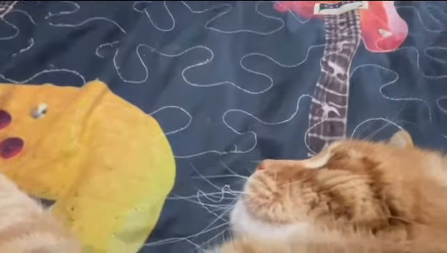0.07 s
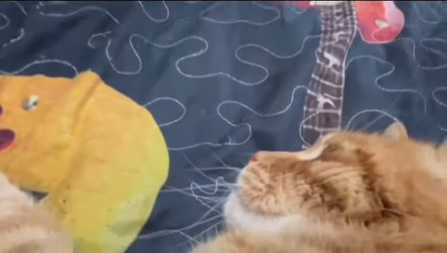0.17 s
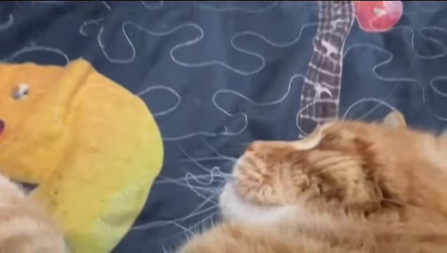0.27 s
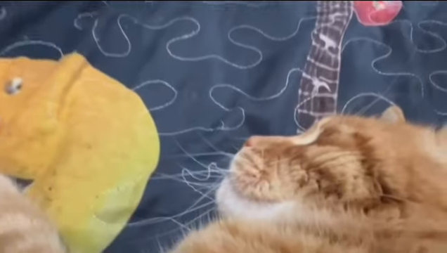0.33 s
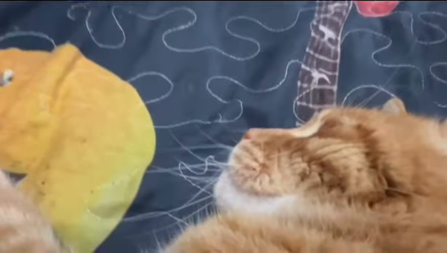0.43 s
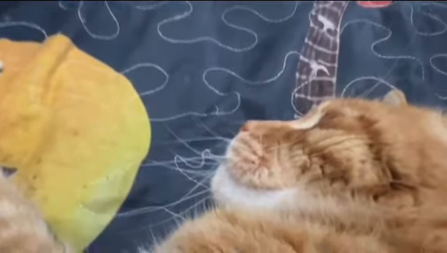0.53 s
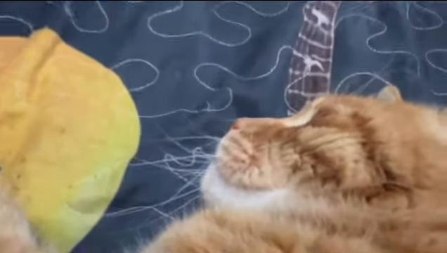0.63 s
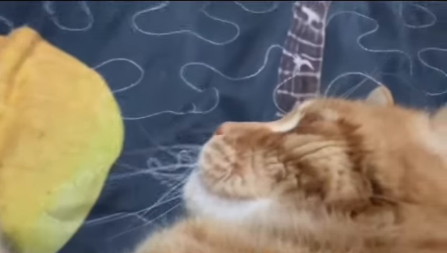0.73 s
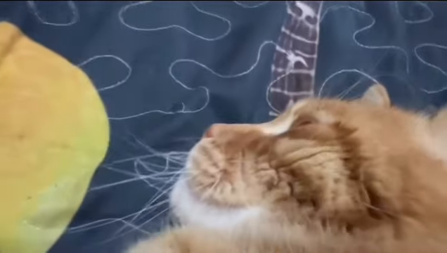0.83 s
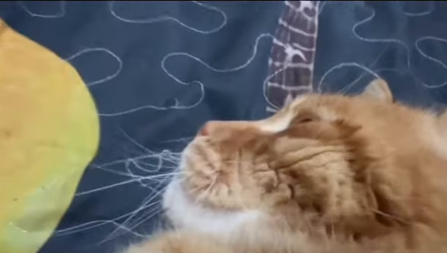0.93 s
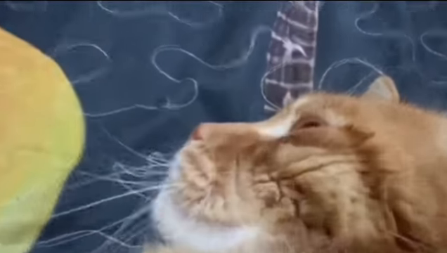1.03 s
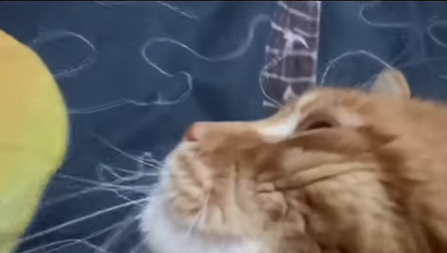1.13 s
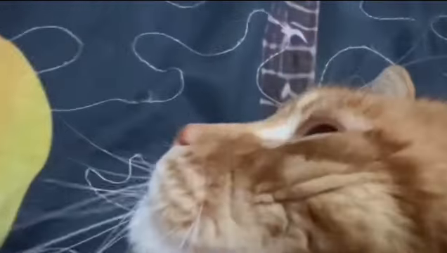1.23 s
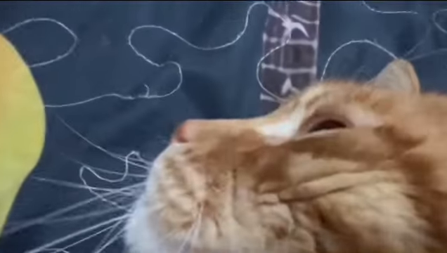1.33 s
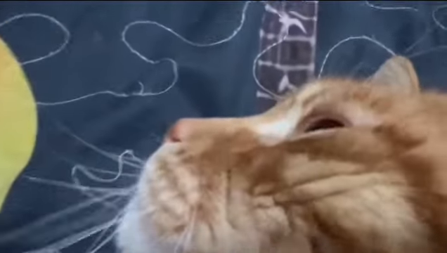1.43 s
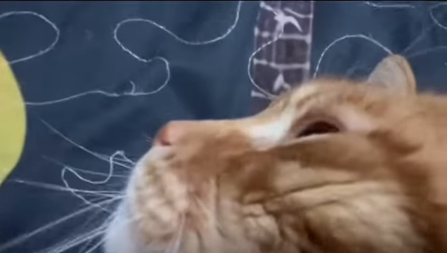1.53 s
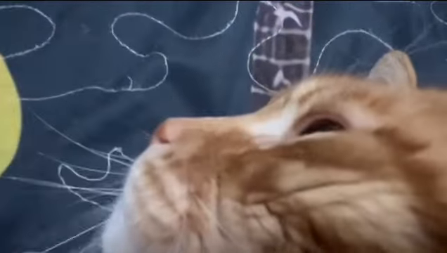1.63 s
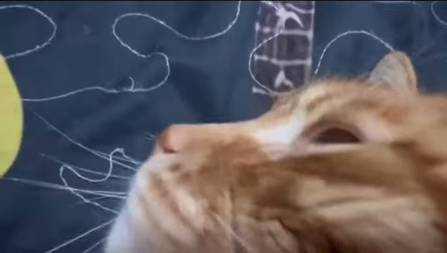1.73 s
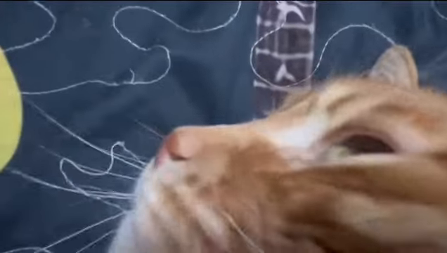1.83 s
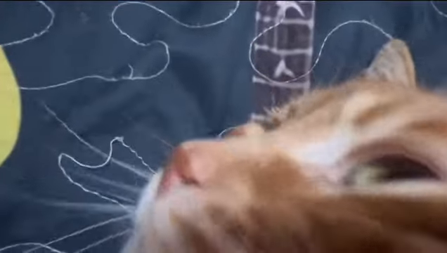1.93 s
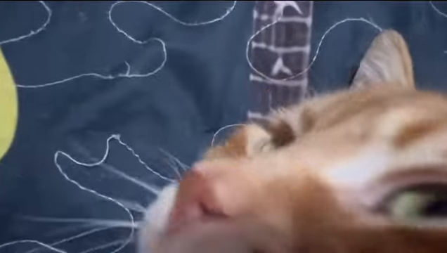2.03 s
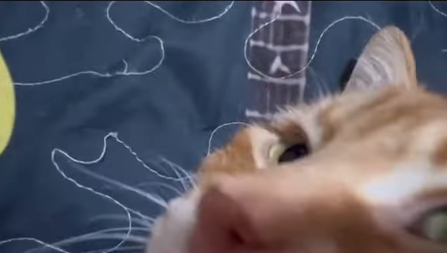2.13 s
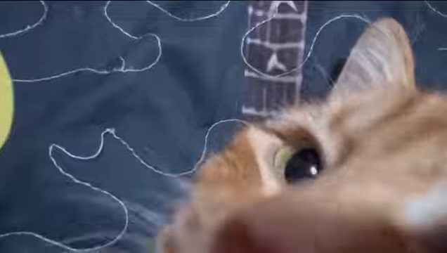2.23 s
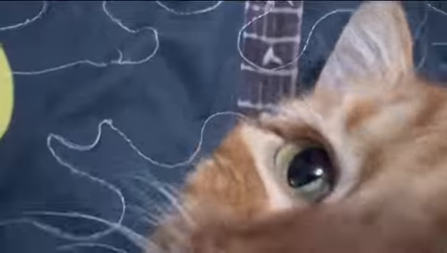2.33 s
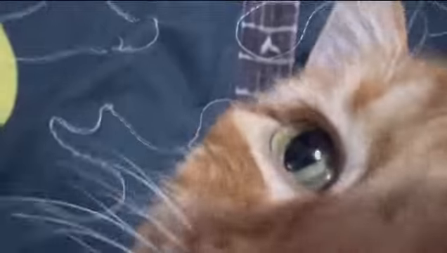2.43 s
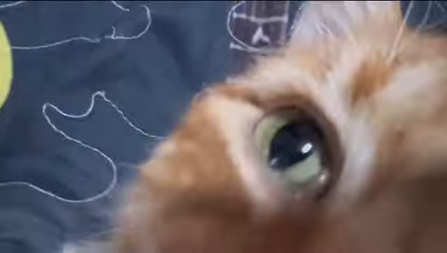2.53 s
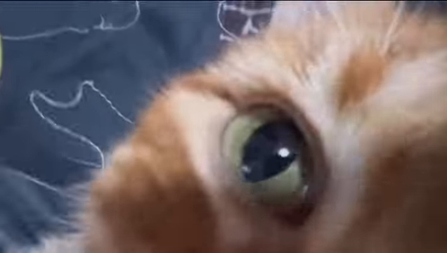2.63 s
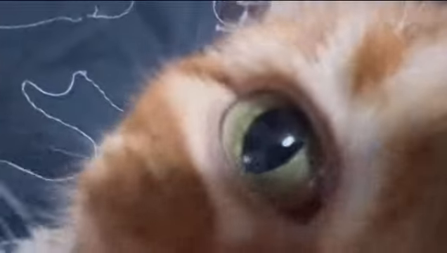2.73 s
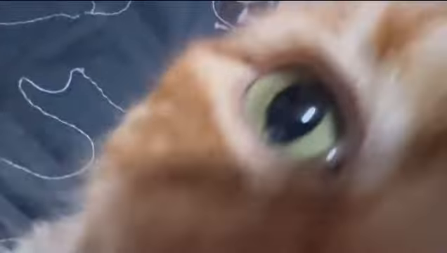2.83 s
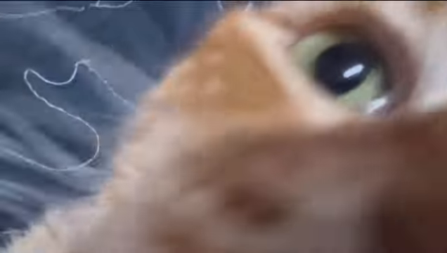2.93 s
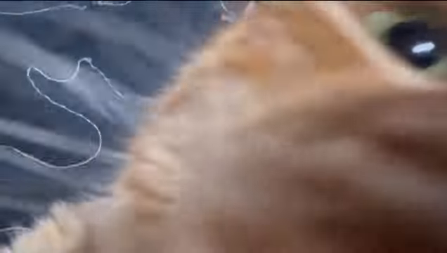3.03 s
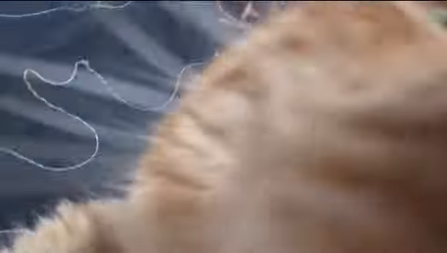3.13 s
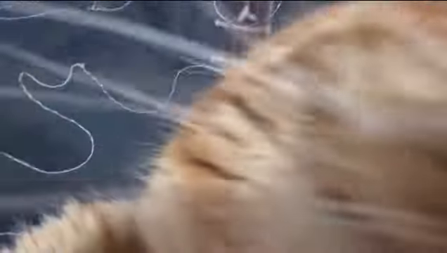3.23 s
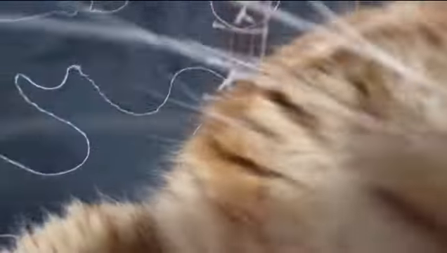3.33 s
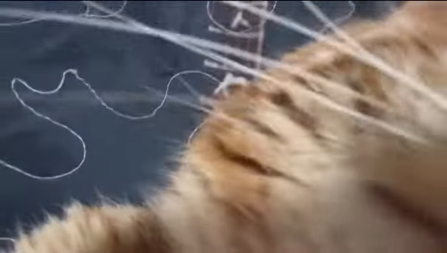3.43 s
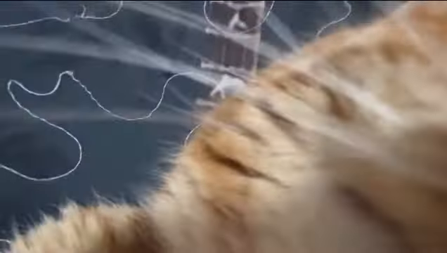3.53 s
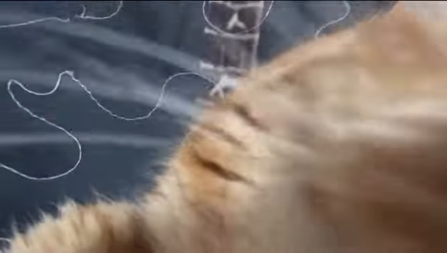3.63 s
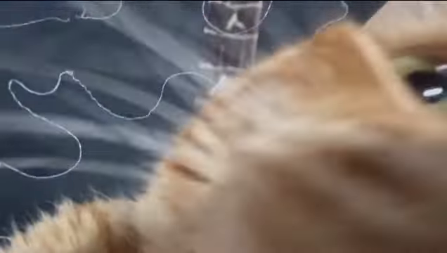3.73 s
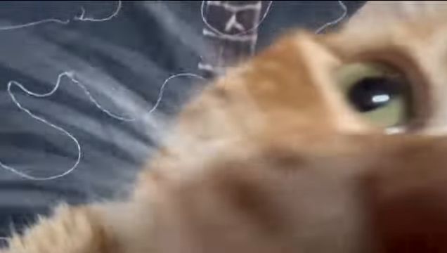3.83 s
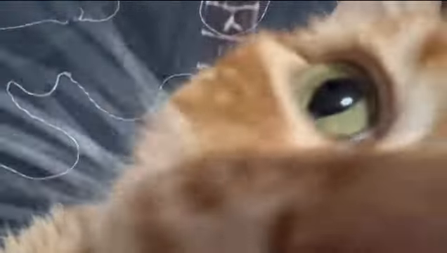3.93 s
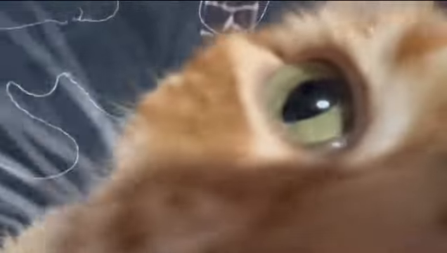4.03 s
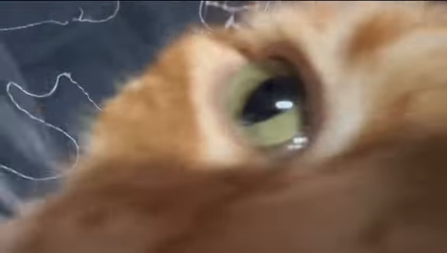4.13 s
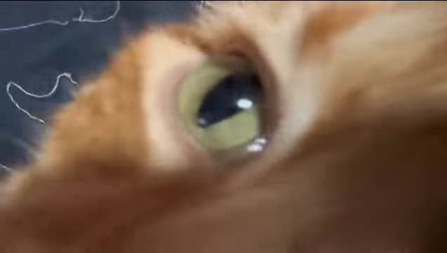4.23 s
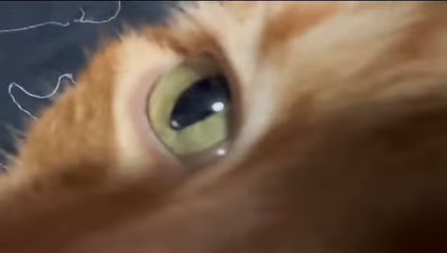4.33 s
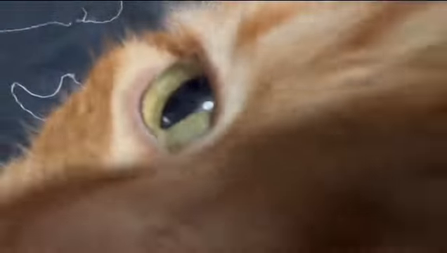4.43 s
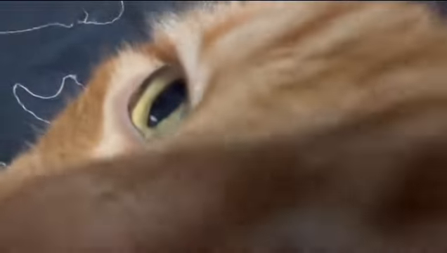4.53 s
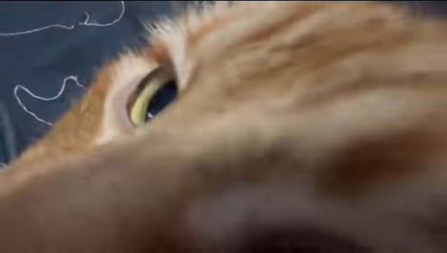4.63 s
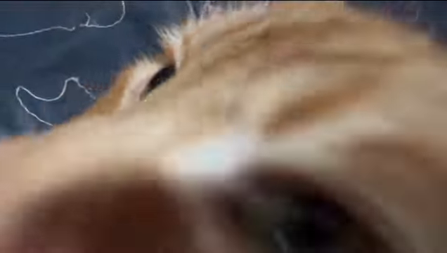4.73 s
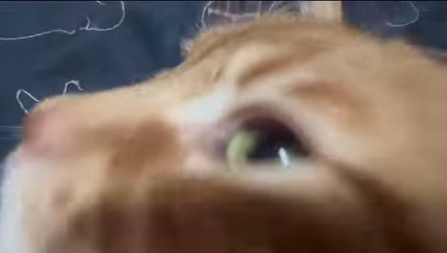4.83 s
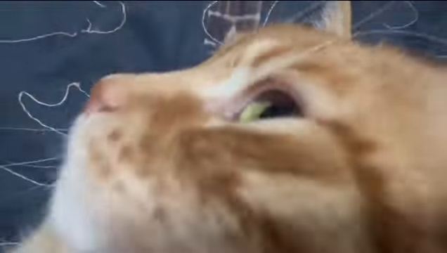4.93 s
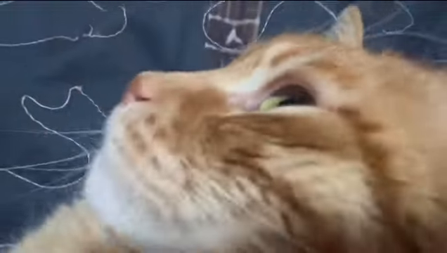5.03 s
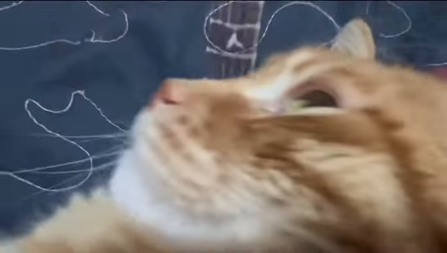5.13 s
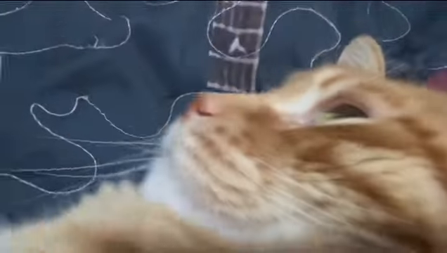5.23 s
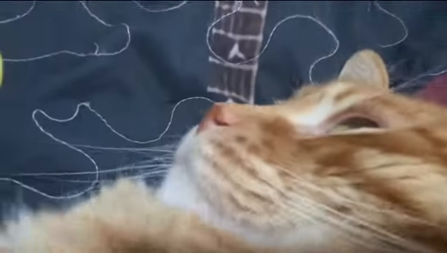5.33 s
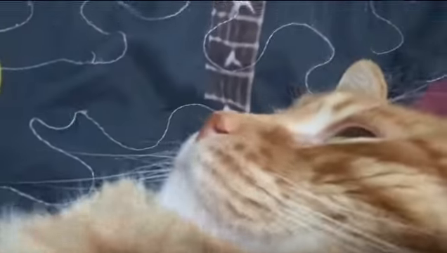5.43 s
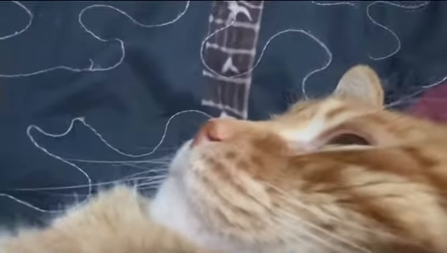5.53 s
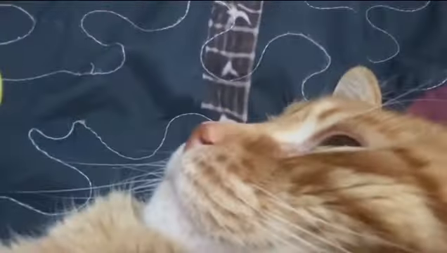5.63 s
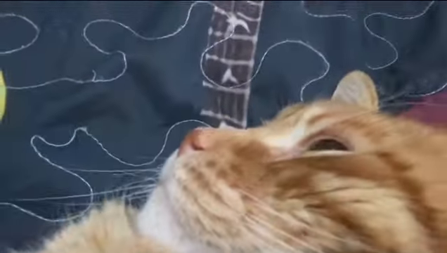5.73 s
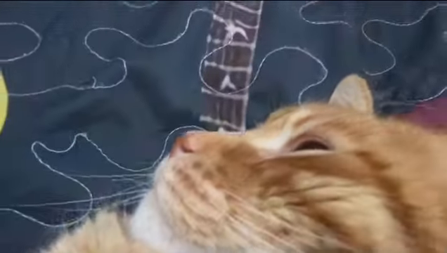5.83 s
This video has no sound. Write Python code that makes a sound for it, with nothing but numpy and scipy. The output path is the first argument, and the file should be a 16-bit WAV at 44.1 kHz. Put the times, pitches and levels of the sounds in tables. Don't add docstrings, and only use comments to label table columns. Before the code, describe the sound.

A cat purrs in a steady low flutter, then nuzzles the phone with loud rumbling, chopped sniffs, wet clicks and a blown breath before quieting.

```python
import sys
import numpy as np
from scipy import signal
from scipy.fft import rfft, irfft, next_fast_len
from scipy.io import wavfile
from scipy.ndimage import uniform_filter1d, map_coordinates

SR = 44100
rng = np.random.default_rng(int(sys.argv[2]) if len(sys.argv) > 2 else 0)


def voltage_ratio(decibels):
    exponent = np.asarray(decibels, float) / 20
    return 10 ** exponent


def persist_wave(psi):
    counts = np.round(np.clip(psi, -1, 1) * 32767).astype(np.int16)
    wavfile.write(sys.argv[1], SR, np.atleast_2d(counts).T)


N = 259749

# (time [s], closures [1/s])
PACE_HZ = [(0.0, 26.58), (0.66, 26.91), (1.54, 26.28), (1.76, 26.51), (2.2, 26.59), (2.42, 25.51),
           (3.08, 27.3), (3.52, 26.1), (3.74, 24.29), (4.4, 26.43), (4.84, 26.2), (5.06, 25.16),
           (5.89, 25.29)]
# (time [s], lead [ms])
HURRY_MS = [(0, 0), (1.7, 0), (1.9, 2), (2.05, -2), (2.25, -2), (2.38, 6), (2.51, 4), (2.56, -2), (2.6, -2),
            (2.66, 1), (2.75, 5), (2.88, 3), (3, 0), (3.95, 0), (4.07, 4), (4.2, 2), (4.35, -3), (4.95, -3),
            (5.05, -1), (5.4, -2), (5.7, 0), (5.89, 0)]
DOZE, HUM, DEEP = (.12, .28, 0, .3), (.2, .3, 0, .05), (.8, .45, 0, .04)
SNIFF, BLOW, SIGH, RASP = (.9, .19, .7, .11), (.95, .3, .1, .9), (.95, .54, .1, .8), (.4, .3, .1, .43)
TASTE, MURMUR = (.9, .42, 0, .06), (.15, .28, 0, .06)
# (start [s], way)
MOODS = [(0, DOZE), (.68, HUM), (1.3, DEEP), (2, SNIFF), (3.01, BLOW), (3.25, SIGH), (3.65, SNIFF),
         (3.93, DEEP), (4.04, TASTE), (4.27, RASP), (4.54, HUM), (5.03, MURMUR), (5.45, DOZE),
         (5.7, MURMUR)]
# (time [s], chest [dB], throat against chest [dB])
PURR_DB = [(0, -54.5, -13), (.3, -58, -15.5), (.54, -62, -11.5), (.8, -55, -14.5), (1.27, -57, -16),
           (1.38, -48.5, -15.5), (1.95, -42.5, -13), (2.37, -46.5, -20), (3.0, -52.5, -26.5),
           (3.7, -53, -10), (3.9, -43.5, -20), (4.23, -43, -18), (4.51, -52, -14), (4.58, -46.5, -16.5),
           (4.92, -49, -12.5), (5.0, -53.5, -17), (5.56, -65.5, -15), (5.89, -54.5, -12)]
# (peak [s], rise [s], fall [s], chest [dB], throat against chest [dB])
PRESSES = [(1.433, 0.026, 0.074, -56.5, 4), (2.073, 0.059, 0.17, -39, -6.5), (2.178, 0.061, 0.14, -35, -13),
           (2.41, 0.013, 0.024, -43.5, -6), (2.471, 0.075, 0.012, -32, -9),
           (2.525, 0.086, 0.27, -33.5, -12), (2.79, 0.16, 0.13, -41, -14.5),
           (2.911, 0.082, 0.11, -29, -9.5), (2.984, 0.11, 0.017, -34.5, -10),
           (3.08, 0.087, 0.09, -21.5, -11), (3.139, 0.088, 0.099, -15.5, -5.5),
           (3.207, 0.054, 0.11, -23, -35), (3.43, 0.79, 0.13, -43, -13.5), (3.61, 0.052, 0.068, -62, 0),
           (3.761, 0.051, 0.072, -46, -6), (3.849, 0.027, 0.14, -50.5, -2),
           (4.151, 0.13, 0.11, -40.5, -7.5), (5.081, 0.082, 0.2, -48.5, -6.5),
           (5.19, 0.082, 0.35, -51.5, -7)]
# (frequency [Hz], density [dB per Hz])
CHEST = [(18, -36.5), (30, -7), (43, 4), (118, 5), (141, 5), (161, -1.5), (298, -26.5), (420, -79),
         (550, -81), (920, -120)]
# (frequency [Hz], density [dB per Hz])
THROAT = [(120, -51), (175, 4), (230, 6.5), (300, 3), (450, -7), (760, -28.5), (1500, -79)]
# (frequency [Hz], density [dB per Hz])
EDDIES = [(120, -61), (190, 3.5), (300, 3), (450, -2.5), (620, -10.5), (740, -22.5), (900, -53),
          (1500, -78)]
# (time [s], share [0-1])
REOPENING = [(0, 0), (1.96, 0), (2, .85), (2.24, .85), (2.28, 0), (2.5, 0), (2.52, .9), (2.6, .8),
             (2.64, .3), (2.92, .2), (2.94, .9), (2.97, 0), (3.72, 0), (3.76, .9), (3.88, .9), (3.9, 0),
             (4.11, 0), (4.13, .9), (4.31, .9), (4.33, 0), (5.89, 0)]
# (centre [Hz], width [Hz], level [dB])
CASE_MODES = [(55.2, 76, 0), (101.9, 78.5, 0)]
# (time [s], deep ring against chest [dB], upper ring against chest [dB])
LEAN_DB = [(0, -27, -27.5), (1.9, -2, -8.5), (2.101, 0.5, -6), (2.9, 3.5, -45), (3.1, -23, -5),
           (3.8, -0.5, -25.5), (4.1, -50, 2.5), (4.3, 0, -6), (5.89, -15.5, -16)]
# (peak [s], rise [s], fall [s], nose hiss [dB], jet hiss
# [dB])
AIR = [(0, 0.36, 0.29, -75.5, -78), (.2, 0.95, 1, -82, -98.5), (.28, 0.14, 0.073, -64.5, -84),
       (.3, 0.6, 1, -77, -80), (.93, 0.15, 0.3, -78, -84), (1.39, 0.1, 0.42, -72, -83),
       (1.8, 1, 0.36, -74.5, -96), (2.08, 0.19, 0.13, -60.5, -80.5), (2.17, 0.26, 0.1, -56, -81),
       (2.46, 0.043, 0.18, -48.5, -61.5), (2.54, 0.18, 0.12, -51, -65.5),
       (2.775, 0.029, 0.02, -63.5, -73.5), (2.806, 0.04, 0.024, -63.5, -74),
       (2.93, 0.071, 0.07, -54.5, -71.5), (3.06, 0.059, 0.31, -55, -66), (3.15, 0.16, 0.34, -61, -60),
       (3.4, 0.35, 0.41, -68.5, -74.5), (3.58, 0.43, 0.11, -67.5, -72.5), (3.78, 0.083, 0.12, -46.5, -63),
       (3.845, 0.049, 0.023, -73, -77), (3.895, 0.035, 0.073, -63, -98), (4.085, .06, 0.17, -92, -86),
       (4.14, 0.13, 0.1, -55, -91), (4.35, 0.15, 0.14, -67, -87.5), (4.53, 0.33, 0.38, -72.5, -105),
       (5.1, 0.079, 0.34, -68.5, -80), (5.66, 0.081, 0.13, -79.5, -95), (5.76, 0.033, 0.052, -102, -72.5)]
# (time [s], strength against steady flow [dB], t60 [s])
SPURTS = [(2.021, -1, 0.054), (2.057, -7, 0.086), (2.114, 3, 0.013), (2.173, 1, 0.074), (2.405, 8.5, .03),
          (2.43, 12, 0.02), (2.444, 10.5, 0.016), (2.514, 8, 0.097), (2.564, 8, 0.072), (2.596, 7.5, 0.057),
          (2.608, 6.5, 0.042), (2.628, 15, 0.028), (2.869, 15.5, 0.032), (2.893, 7, 0.036),
          (2.91, -2, 0.016), (2.934, 7, 0.023), (2.947, -8, 0.039), (2.974, 9, 0.041), (3.022, 8, 0.026),
          (3.044, -4, 0.024), (3.433, 2, 0.02), (3.508, 9.5, 0.022), (3.546, 1.5, 0.015),
          (3.704, 10.5, 0.033), (3.728, 8, 0.04), (3.766, -9, 0.017), (3.809, 1.5, 0.083), (3.82, 6, 0.017),
          (3.851, 4, 0.05), (3.863, 12.5, 0.047), (3.885, 0, 0.083), (3.912, 3.5, 0.014), (4.048, 5, 0.044),
          (4.064, 5.5, .03), (4.088, 10, 0.024), (4.1257, 9.5, 0.019), (4.146, 4.5, 0.039),
          (4.161, 5, 0.097), (4.207, -2, 0.025), (4.322, -11, 0.024), (4.36, -7, .03), (4.377, 0, 0.024),
          (4.397, 0.5, 0.027)]
# (centre [Hz], width [Hz], level [dB])
LOWER_NOSE = [(616, 630, 8.5), (1038, 480, 9.5), (1486, 550, -3), (2330, 1180, 10)]
# (centre [Hz], width [Hz], level [dB])
UPPER_NOSE = [(3084, 770, 4.5), (3636, 720, 1), (4690, 1100, -11.5), (5600, 620, -13)]
# (time [s], upper against lower resonances [dB])
NARROWING_DB = [(0, 0), (.5, -28), (1.3, 7.5), (1.9, 2), (2.1, -1), (2.9, -5.5), (3.8, -4.5), (4.14, 0),
                (4.5, -5), (5.89, -10.5)]
# (frequency [Hz], density [dB per Hz])
LIP_STREAM = [(300, 7), (700, 6.5), (1500, 0), (3000, 0), (4500, -2), (6500, -44), (8000, -19)]
# (frequency [Hz], density [dB per Hz])
JET_BODY = [(3500, -28), (6500, -0.5), (8200, 3), (9800, -5), (11000, -14.5), (12500, -22), (14000, -22),
            (15700, -49.5)]
# (frequency [Hz], density [dB per Hz])
JET_TOP = [(9500, -30), (11200, -3), (12500, -5), (14000, -3), (14900, -7), (15700, -9)]
# (centre [Hz], width [Hz], level [dB])
SLOT_MODES = [(9660, 1900, 0)]
# (time [s], ring against body [dB], top against body [dB])
AIM_DB = [(0, -17, 1), (1.9, -18, -12), (2.05, 4, 1), (2.15, 3, -11), (2.3, -10, -6), (2.46, -10, -13),
          (2.55, -21, -14), (2.9, -24, -9), (3.06, -8, -6), (3.15, 4.5, 0), (3.24, -13, -5), (3.4, -15, 2),
          (3.6, -12, 1), (3.76, -19, -15), (3.83, -14, 1.5), (4.1, -16, -2), (5.89, -5, -12)]
# (time [s], share [0-1])
JET_LEAK = [(0, 0), (1.95, 0), (2.03, .6), (2.25, .6), (2.4, .1), (3, 0), (3.7, 0), (3.8, .15), (4, .8),
            (4.25, .8), (4.4, 0), (5.89, 0)]
# (time [s], level [dB], slowest in cycle [Hz], fastest in cycle [Hz])
FLUTTER = [(3.02, -72, 109.9, 299.3), (3.045, -35, 99.5, 330.7), (3.09, -29.5, 98.4, 344.6),
           (3.13, -24, 99.6, 322.6), (3.17, -30, 105.5, 383), (3.21, -21, 102.5, 320),
           (3.225, -32.5, 67.6, 79.5), (3.27, -25.5, 61.7, 83), (3.34, -46, 53.8, 63),
           (3.45, -39, 49.7, 81.5), (3.5, -85, 51.4, 62.8)]
# (time [s], peak [dB])
POPS = [(2.069, -33.5), (2.1845, -29.5), (2.447, -30), (2.465, -29), (2.487, -22.5), (2.5264, -22.5),
        (2.566, -35), (2.867, -38.5), (2.896, -38), (2.908, -34), (2.946, -32.5), (2.975, -41),
        (3.822, -43), (5.052, -56), (5.078, -45), (5.111, -49), (3.727, -65), (3.7449, -25),
        (3.7848, -22.5), (3.866, -29.5), (4.1269, -39.5)]
# (time [s], peak [dB], low part [dB], t60 [s], colour [Hz])
TICKS = [(0.214, -56, -1, 0.0046, 12600), (0.2227, -51, -8, 0.0086, 7550), (0.4995, -57, -22, 0.0083, 8300),
         (1.048, -48.5, -3, 0.0038, 5150), (1.2118, -72, -11, 0.012, 12200),
         (1.8432, -61, -25, 0.0076, 6800), (1.868, -67.5, -20, 0.011, 12600), (1.88, -63, -20, 0.01, 12600),
         (4.4916, -88, 36.5, 0.018, 5830), (4.53, -77.5, 26, 0.0062, 5500), (4.539, -75, 23, 0.009, 5000),
         (4.572, -74, 8, 0.02, 4500), (4.123, -52, 1, 0.03, 3260), (4.086, -63, 3, .03, 3640),
         (3.362, -62, -20, .006, 10000), (5.0504, -82, -3, 0.009, 5550), (5.065, -62.5, -13, 0.0085, 11100),
         (5.08, -76.5, 23, 0.017, 11400), (5.129, -55, -22, 0.011, 5800), (5.285, -67, -7, 0.0035, 12300),
         (5.5773, -73, -26, 0.017, 12700), (5.6453, -77.5, 23.5, 0.0084, 5660),
         (5.66, -80, 18.5, 0.03, 5600), (5.262, -88, 22, 0.006, 5600), (5.7472, -56.5, -6, 0.015, 8600)]
# (time [s], level [dB], frequency [Hz], t60 [s])
LOW_THUDS = [(0.816, -62.5, 387, 0.13), (2.467, -1.5, 260, 0.016), (2.479, -8.5, 90, 0.036),
             (2.902, -29, 120, 0.011), (3.1, -31, 53.5, 0.25), (3.19, -31, 51.5, 0.4), (3.415, -39, 104, 0.076),
             (5.07, -46, 192, 0.047), (5.11, -43.5, 233, 0.045), (5.192, -35.5, 217, 0.024),
             (5.607, -45.5, 178, 0.026)]
# (start [s], length [s], first [Hz], last [Hz], level [dB])
WHISTLES = [(.89, .08, 4800, 4600, -91), (.71, .025, 11600, 11400, -92), (5.27, .11, 1300, 1280, -82),
            (5.53, .08, 1300, 1300, -91), (5.62, .055, 1300, 1300, -90), (5.82, .07, 1300, 1300, -95),
            (4.615, .075, 4280, 3900, -87), (4.33, .19, 4800, 4780, -90), (4.18, .09, 4800, 4800, -96),
            (4.6, .07, 6200, 6050, -94)]
# (frequency [Hz], density [dB per Hz])
ROOM = [(292, -17.5), (360, -31.5), (592, -14), (789, -24), (1230, -25.5), (1640, -31.5), (4680, -35),
        (8540, -45), (11100, -47), (13000, -48.5), (14500, -60.5), (15600, -71)]
# (time [s], mid loss [dB], bass loss [dB])
SHADE_DB = [(0, 3, 1.5), (1.3, 3, 2.5), (2.1, 5, 2), (2.7, 5, 1.5), (2.85, 2, 0), (3.95, 3, -1),
            (4.25, 6, 4.5), (4.5, 5, 6), (5.05, -2, 1.5), (5.89, 3, 1.5)]
# (frequency [Hz], left lead [rad])
LEAD_RAD = [(30, .2), (120, .36), (350, .45), (700, 1), (2800, 2), (4500, 1), (7700, -2.95), (8700, -3.35),
            (11300, -6), (13000, -6.8), (14500, -8.9), (15300, -9.5)]
# (frequency [Hz], likeness [0-1])
ALIKE = [(60, .99), (400, .98), (1000, .85), (4000, .6), (7400, .96), (8200, .997), (9000, .95),
         (15000, .8)]


def unit(x):
    return x / np.sqrt(np.mean(x ** 2) + 1e-20)


def along(points, hz):
    f, v = np.transpose(points)
    return np.interp(np.log(hz + 1), np.log(f + 1), v)


def curves(rows):
    s, *cols = np.transpose(rows)
    return [np.interp(np.arange(N) / SR, s, c) for c in cols]


def wobble(knots_hz):
    knots = rng.standard_normal(int(N * knots_hz / SR) + 4)
    return map_coordinates(knots, [np.arange(N) * knots_hz / SR])


def filtered(x, response):
    m = next_fast_len(N + SR // 2)
    return irfft(rfft(x, m) * response(np.fft.rfftfreq(m, 1 / SR)), m)[..., :N]


def shaped(x, table):
    return unit(filtered(x, lambda hz: voltage_ratio(along(table, hz))))


def modes(table, order):
    def response(f):
        total = 0
        for k, (c, w, db) in enumerate(table):
            band = 1j * f * w / (c * c - f * f + 1j * f * w)
            total = total + (-1) ** k * voltage_ratio(db) * band ** order
        return total
    return response


def noise():
    return rng.standard_normal((2, N))


def swells(rows):
    edge_db, roundness = 31, 1.68
    s, rise, fall, *levels = np.transpose(rows)[:, :, None]
    grid = np.arange(0, N + 64, 64)
    late = grid / SR - s
    reach = np.clip(np.where(late < 0, -late / rise, late / fall), 0, 4)
    shape_db = -edge_db * reach ** roundness
    total = [10 * np.log10((voltage_ratio(db + shape_db) ** 2).sum(0) + 1e-13) for db in levels]
    return [np.interp(np.arange(N), grid, db) for db in total]


def mood():
    change_s = .07
    now = np.searchsorted([s for s, _ in MOODS], np.arange(N) / SR, "right") - 1
    ways = np.array([way for _, way in MOODS])[now].T
    return uniform_filter1d(ways, round(change_s * SR), axis=1, mode="nearest")


def larynx():
    first_cycle, shuts_at = -.1 + .2, .95
    turn_s, turn_takes_s = 1.285, .015
    depth, reopen, pop, _ = mood()
    cycle = first_cycle + np.cumsum(curves(PACE_HZ)[0]) / SR
    cycle = cycle + .026 * curves(HURRY_MS)[0] + .012 * wobble(26)
    count, u = np.floor(cycle).astype(int) + 1, cycle % 1
    spread_db = rng.normal(0, 1, (count.max() + 1, 3)) * [1.5, 1.6, 3]
    thump_size, swell_size, burst_size = voltage_ratio(spread_db)[count].T

    since = np.clip(u - reopen, 0, 1)
    opening = np.clip(since / (.01 + .12 * (1 - pop) ** 2), 0, 1)
    swell = (.35 + 1.5 * since) * opening * np.clip((shuts_at - u) / .13, 0, 1)
    burst = .9 * pop * burst_size * np.exp(-since / .06) * (u > reopen)
    flow = np.clip(1 - depth, 0, 1) + depth * 1.2 * (swell * swell_size + burst)

    sign = np.clip((np.arange(N) / SR - turn_s) / turn_takes_s, -1, 1)
    closure = np.diff(count, prepend=count[0]).clip(0) * thump_size * sign
    return closure, flow, u


def effort():
    chest_db, over_db = curves(PURR_DB)
    presses = [(s, rise, fall, db, db + over) for s, rise, fall, db, over in PRESSES]
    pressed_chest_db, pressed_throat_db = swells(presses)
    throat_db = 10 * np.log10(voltage_ratio(chest_db + over_db) ** 2 + voltage_ratio(pressed_throat_db) ** 2)
    chest_db = 10 * np.log10(voltage_ratio(chest_db) ** 2 + voltage_ratio(pressed_chest_db) ** 2)
    return chest_db, throat_db - chest_db


def sweep(hz):
    return np.exp(-1j * (4 * (np.log((hz + 9) / 119) + 1) + .9))


def knock(hz):
    top_hz, early_s, join_hz = 392, .0018, 180
    return sweep(hz) * np.exp(2j * np.pi * (hz - join_hz) * early_s) / (1 + (hz / top_hz) ** 8)


def thump_and_gust(beat, table, shape, drive, eddies, rasp, rough):
    thump = unit(filtered(beat, lambda hz: voltage_ratio(along(table, hz)) * shape(hz)))
    gust = shaped(drive * eddies, rasp)
    return np.sqrt(1 - rough) * thump * [[1], [0]] + np.sqrt(rough) * gust


def purr(closure, u):
    reopen_s = .0095
    chest_db, throat_db = effort()
    chest_db = chest_db - 0.2 * np.clip(curves(FLUTTER)[0] + 46, 0, 40)
    rough = mood()[3]
    flicker = voltage_ratio(2.2 * wobble(30))
    surge = (.5 + np.exp(-((u - .25) / .24) ** 2)) * flicker
    blown = np.clip((rough - .5) / .35, 0, 1)
    bursts = (.1 + 1.7 * np.cos(np.pi * (u - .04)) ** 4) * flicker
    blast = (1 - blown) * surge + blown * bursts
    late = curves(REOPENING)[0]
    parting = closure * np.sqrt(1 - late) + np.roll(closure * np.sqrt(late), round(reopen_s * SR))

    eddies = noise()
    chest = thump_and_gust(closure, CHEST, sweep, surge, eddies, CHEST, rough)
    throat = thump_and_gust(parting, THROAT, knock, blast, eddies, EDDIES, rough ** .8)
    out = voltage_ratio(chest_db) * chest + voltage_ratio(chest_db + throat_db) * throat
    for mode, ring_db in zip(CASE_MODES, curves(LEAN_DB)):
        ring = unit(filtered(closure, modes([mode], order=3)))
        out = out + voltage_ratio(chest_db + ring_db) * ring * [[1], [0]]
    return out


def spurts():
    out, t = np.zeros(N + SR), np.arange(SR // 12) / SR
    for s, db, t60 in SPURTS:
        out[round(s * SR):][:len(t)] += voltage_ratio(db + 3 - 60 * t / t60) * (1 - np.exp(-t / 0.00035))
    return out[:N]


def nose_hiss(flow, u):
    opens_at, open_at = .22, .7
    _, reopen, _, rough = mood()
    ajar = np.clip(np.minimum((.99 - u) / .05, (u - .04) / .06), .1, 1)
    leak = (1 + 2 * rough) * np.clip(reopen - .22, 0, 1)
    air = noise() * (flow + leak + spurts() * ajar) * voltage_ratio(3.5 * wobble(300))
    narrow = voltage_ratio(curves(NARROWING_DB)[0])
    lower = unit(filtered(air, modes(LOWER_NOSE, order=3)))
    upper = unit(filtered(air, modes(UPPER_NOSE, order=3)))
    nose = (lower - narrow * upper) / np.sqrt(1 + narrow ** 2)
    parted = np.clip((rough - opens_at) / (open_at - opens_at), 0, 1)
    return np.sqrt(1 - parted) * nose + np.sqrt(parted) * shaped(air, LIP_STREAM)


def port_jet(flow, u):
    gather = 1 - 1.1 * mood()[2] * np.clip((.6 - u) / .3, 0, 1)
    air = noise() * (flow ** .9 * gather + curves(JET_LEAK)[0])
    ring_db, top_db = curves(AIM_DB)
    top = voltage_ratio(top_db + 1.6 * wobble(25)) * shaped(air, JET_TOP)
    ring = voltage_ratio(ring_db + 2.2 * wobble(40)) * unit(filtered(air, modes(SLOT_MODES, order=2)))
    return shaped(air, JET_BODY) + top + ring


def breath(flow, u):
    nose_db, jet_db = swells(AIR)
    flow = flow / np.sqrt(np.abs(uniform_filter1d(flow ** 2, SR // 13)) + 1e-9)
    return voltage_ratio(nose_db) * nose_hiss(flow, u) + voltage_ratio(jet_db - 2) * port_jet(flow, u)


def flutter(u):
    db, slow_hz, fast_hz = curves(FLUTTER)
    speed = .45 + .52 * np.tanh(1.8 * np.cos(2 * np.pi * (u - .03))) + .13 * wobble(70)
    speed = np.clip(speed, -.2, 1.2)
    turns = np.cumsum(slow_hz * (fast_hz / slow_hz) ** speed) / SR
    return voltage_ratio(db + 3 + 1.8 * wobble(70) - 3.5 * speed) * np.sin(2 * np.pi * turns) * [[1], [0]]


def pops():
    click_hz, click_t60_s, fizz_t60_s = 1440, .0022, .014
    smack_hz, smack_t60_s = 535, .005
    out, t = np.zeros((2, N)), np.arange(SR // 40) / SR
    click = -np.sin(2 * np.pi * click_hz * t) * voltage_ratio(-60 * t / click_t60_s) * [[1], [.4]]
    smack = np.sin(2 * np.pi * smack_hz * t) * voltage_ratio(-60 * t / smack_t60_s) * [[1], [0]]
    lowpass = signal.butter(2, 2 * click_hz, fs=SR)
    for s, db in POPS:
        spray = rng.standard_normal((2, len(t))) * voltage_ratio(-9 - 60 * t / fizz_t60_s)
        fizz = signal.lfilter(*lowpass, spray)
        out[:, round(s * SR):][:, :len(t)] += voltage_ratio(db - 5) * (click + fizz + smack)
    return out


def ticks():
    bright, dull = np.zeros((2, N + SR)), np.zeros((2, N + SR))
    t = np.arange(SR // 8) / SR
    for s, db, low_db, t60, hz in TICKS:
        puff = rng.standard_normal((2, len(t))) * voltage_ratio(db - 60 * t / t60)
        edges_hz = np.clip([hz / 1.8, hz * 1.4], 500, 16000)
        band = signal.butter(2, edges_hz, "band", fs=SR)
        bright[:, round(s * SR):][:, :len(t)] += voltage_ratio(3.5) * signal.lfilter(*band, puff)
        dull[:, round(s * SR):][:, :len(t)] += puff * voltage_ratio(low_db + 9)
    return bright[:, :N] + filtered(dull[:, :N], modes([(2180, 1280, 0.0045)], order=2))


def low_thuds():
    out, t = np.zeros(N + SR), np.arange(SR // 8) / SR
    for s, db, hz, t60 in LOW_THUDS:
        thud = voltage_ratio(db + 5.5 - 60 * t / t60) * np.sin(2 * np.pi * hz * t) * (1 - np.exp(-t / 0.0081))
        out[round(s * SR):][:len(t)] += thud
    return out[:N] * [[1], [0]]


def whistles():
    out = np.zeros(N)
    for start, length, first_hz, last_hz, db in WHISTLES:
        part = np.clip((np.arange(N) / SR - start) / length, 0, 1)
        turns = np.cumsum(first_hz + (last_hz - first_hz) * part) / SR
        tone = np.sin(2 * np.pi * turns + 1.7 * wobble(first_hz / 16))
        out += np.sqrt(4 * part * (1 - part)) * voltage_ratio(db + 8 + 3 * wobble(60)) * tone
    return out * [[1], [0]]


def room():
    hush = unit(filtered(noise(), lambda hz: voltage_ratio(along(ROOM, hz)) * (hz > 300)))
    return voltage_ratio(-83 + 7 + .8 * wobble(4)) * hush


def ports(pair):
    shade_per_db, shade_from_db = .32, -90
    mid_db, bass_db = curves(SHADE_DB)
    mid_db = mid_db + shade_per_db * np.clip(swells(AIR)[0] - shade_from_db, 0, None)

    def mix(hz):
        like = np.clip(along(ALIKE, hz), 0, 1)
        return np.exp(-1j * along(LEAD_RAD, hz)) * np.sqrt([like ** 2, 1 - like ** 2])

    def bass(hz):
        return 1 / (1 + (hz / 520) ** 4)

    def top(hz):
        return 1 / (1 + (6200 / (hz + 1)) ** 8)

    def mid(hz):
        return 1 - bass(hz) - top(hz)

    low, high, middle = [filtered(pair, lambda hz: mix(hz) * band(hz)).sum(0) for band in (bass, top, mid)]
    left = pair[0] * voltage_ratio(bass_db / 2)
    right = low * voltage_ratio(-bass_db / 2) + high + middle * voltage_ratio(-mid_db)
    return np.array([left, right])


def scene():
    closure, flow, u = larynx()
    cat = purr(closure, u) + breath(flow, u) + flutter(u) + pops()
    contacts = ticks() + low_thuds() + whistles()
    return ports(cat + contacts + room())


def low_pass(x):
    return signal.sosfilt(signal.butter(12, 15730, fs=SR, output="sos"), x)


def record(dry):
    cut_hz, ceiling = 32, .31
    cut = filtered(dry, lambda hz: (1j * hz / (cut_hz + 1j * hz)) ** 2)
    held = cut / (1 + np.abs(cut / ceiling) ** 4) ** .25
    return low_pass(held)


dry = scene()
out = record(dry)
persist_wave(out)
```